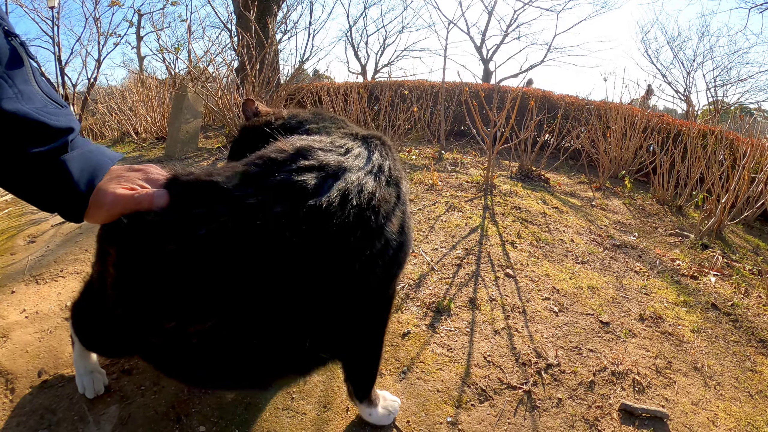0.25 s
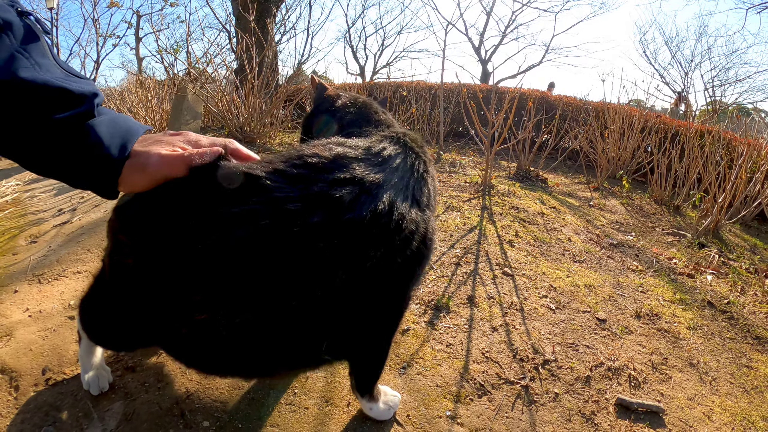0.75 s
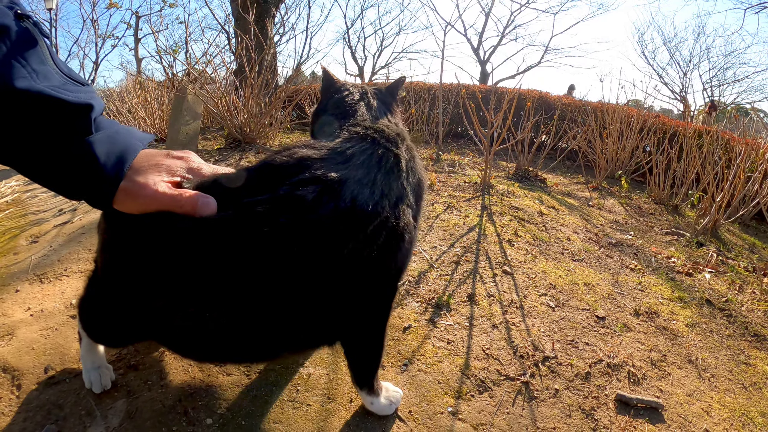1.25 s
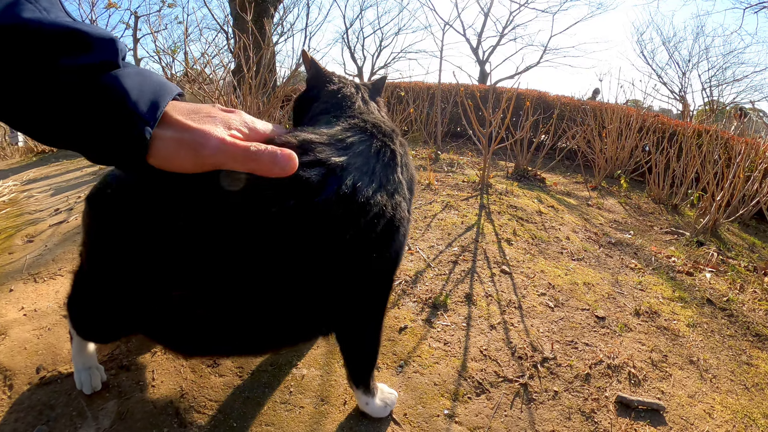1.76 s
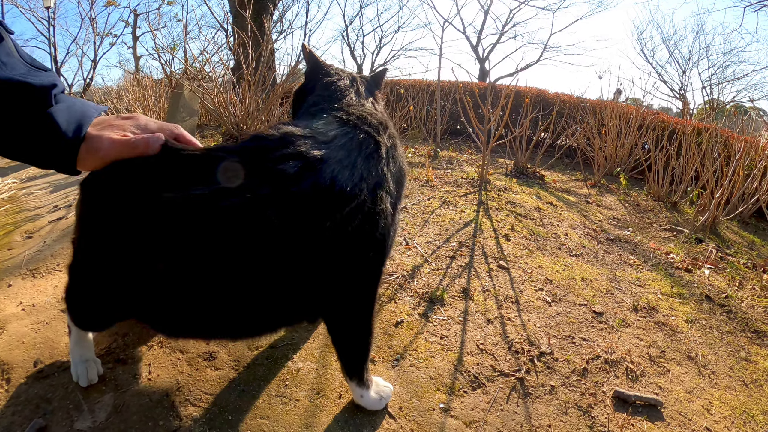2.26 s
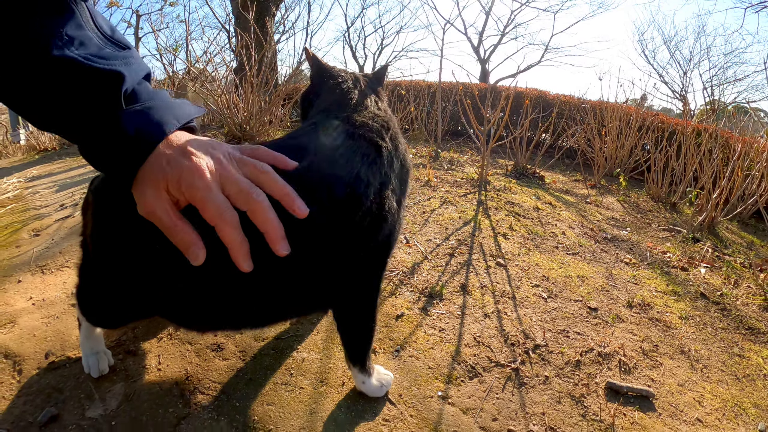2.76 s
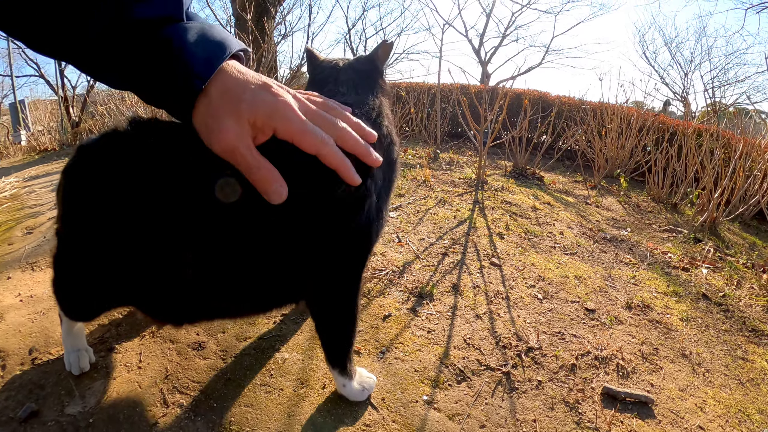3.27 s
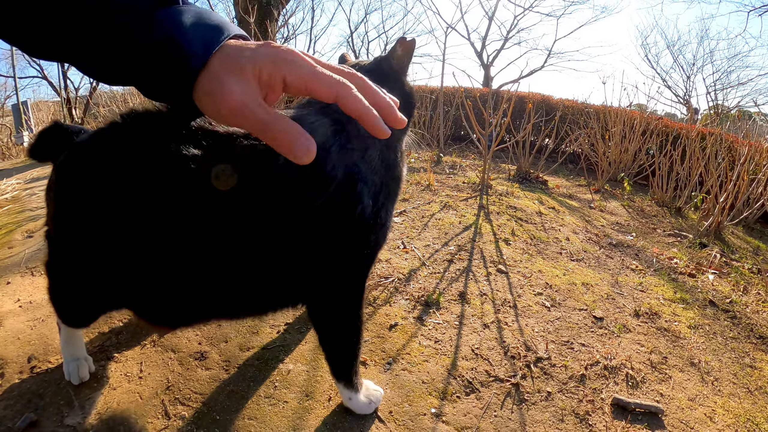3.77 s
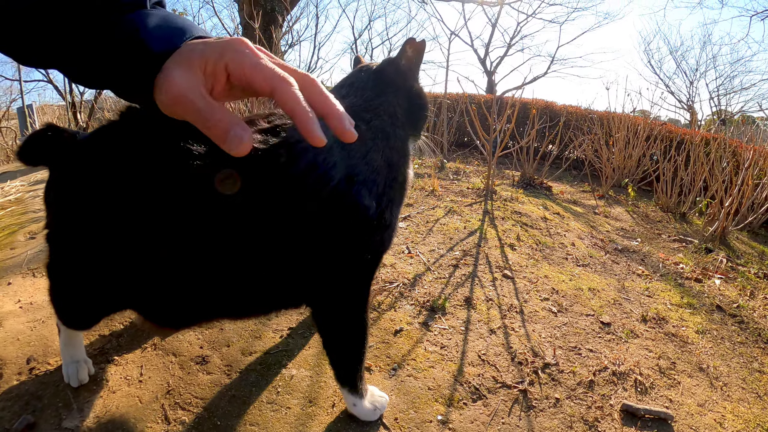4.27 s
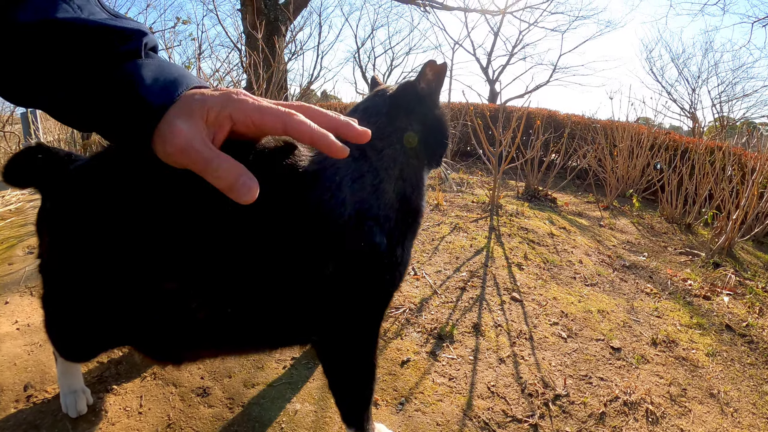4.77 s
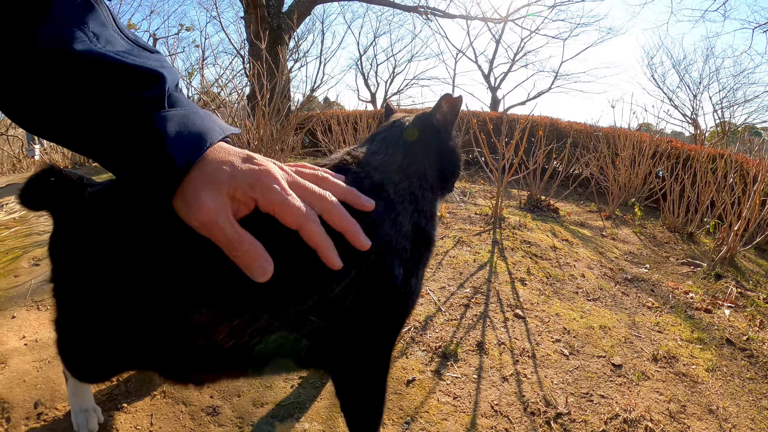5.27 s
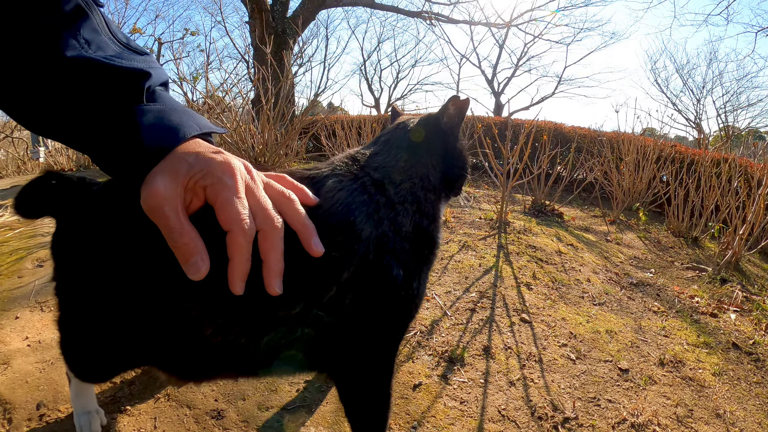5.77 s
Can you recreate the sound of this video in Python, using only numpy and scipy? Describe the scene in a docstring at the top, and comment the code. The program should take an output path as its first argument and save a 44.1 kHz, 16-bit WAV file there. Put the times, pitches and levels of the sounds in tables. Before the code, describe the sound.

Low traffic rumble outdoors while a hand softly pats a cat's fur, then a slow chugging engine approaches close by, passes and begins to fade.

```python
"""Engine passing a park hedge

Far traffic rumbles and surges; a slow-firing engine draws near on the road, passes and fades.
Exhaust: phased cosine orders of the firing rate, swelling and sinking as direct and reflected paths meet.
Gear hiss, narrow rings and tread roar: shaped noise, weaker as 1 / distance. Close by, a hand pats and
strokes a cat's fur: decaying scrapes and swishes of noise. A small camera microphone hears it in mono."""
import sys
import numpy as np
from scipy import signal
from scipy.fft import rfft, irfft, next_fast_len
from scipy.io import wavfile
from scipy.ndimage import uniform_filter1d

SR = 44100
rng = np.random.default_rng(int(sys.argv[2]) if len(sys.argv) > 2 else 0)


def store_pcm(level_fs):
    """Save levels as 16-bit WAV."""
    pcm = np.round(np.clip(level_fs, -1, 1) * 32767).astype(np.int16)
    wavfile.write(sys.argv[1], SR, np.atleast_2d(pcm).T)


N = 265482
T = np.arange(N) / SR
FFT_LEN = next_fast_len(N)
FFT_HZ = np.fft.rfftfreq(FFT_LEN, 1 / SR)

SPEED_M_S, CLOSEST_M, PASSES_S = 6.2, 4.454, 4.55
SOUND_M_S = 343
FIRING_HZ = 32  # before Doppler shift


def undb(db):
    """Amplitude ratio of a level in dB."""
    return np.exp(np.asarray(db) * np.log(10) / 20)


def level(x, db):
    """Scale x to an rms level in dB."""
    return x * undb(db) / np.sqrt(np.mean(x ** 2))


def walk(rate_hz):
    """Random levels held 1 / rate_hz and slewed twice; spread near 1."""
    hold = int(SR / rate_hz)
    steps = np.repeat(rng.standard_normal(N // hold + 1), hold)
    slewed = uniform_filter1d(uniform_filter1d(steps, hold), hold)
    return 1.374 * slewed[:N]


def bell(centre_s, sigma_s):
    """Gaussian in time, peak 1."""
    return np.exp(-.5 * ((T - centre_s) / sigma_s) ** 2)


def over_time(table):
    """Straight lines through a (t/s, value) table."""
    return np.interp(T, *np.transpose(table))


def double_peak(x, hz, q):
    """Resonance applied twice for steep skirts."""
    peak = signal.iirpeak(hz, q, fs=SR)
    return signal.lfilter(*peak, signal.lfilter(*peak, x))


def shape(table):
    """Bin gains of a (f/Hz, level/dB) table, straight on a log-frequency axis; -120 dB outside."""
    hz, db = np.transpose(table)
    return undb(np.interp(np.log(FFT_HZ + 1), np.log(hz), db, -120, -120))


def hiss(table, band_hz=(1200, 5000), treble_db=0, flicker_db=0, rate_hz=10):
    """Shaped noise, rms 1 in band_hz before tilt (dB/octave above 2.5 kHz) and third-octave flicker."""
    full = rfft(rng.standard_normal(FFT_LEN)) * shape(table)
    in_band = irfft(full * shape([(band_hz[0], 0), (band_hz[1], 0)]), FFT_LEN)
    full = full / np.std(in_band)
    third = 3 * np.log2((FFT_HZ + 1) / 2500)  # third-octaves from 2.5 kHz
    if flicker_db == 0:
        return irfft(full * undb(treble_db * np.maximum(third, 0) / 3), FFT_LEN)[:N]
    low, high = 3 * np.log2(np.array([table[0][0], table[-1][0]]) / 2500)
    out = np.zeros(N)
    for centre in np.arange(np.floor(low), np.ceil(high) + 1):
        window = np.cos(np.pi / 2 * np.clip(third - centre, -1, 1)) ** 2
        band = irfft(full * window, FFT_LEN)[:N]
        tilt_db = treble_db * max(centre, 0) / 3
        out += band * undb(tilt_db + flicker_db * walk(rate_hz))
    return out


def vehicle():
    """Straight pass: exhaust, gears and tyres, all weaker as 1 / distance."""
    along_m = SPEED_M_S * (T - PASSES_S)
    distance_m = np.hypot(along_m, CLOSEST_M)
    spread_db = 20 * np.log10(CLOSEST_M / distance_m)
    behind = along_m / distance_m  # towards -1 coming, +1 leaving
    return exhaust(spread_db, behind) + gears(spread_db, behind) + tyres(spread_db, behind)


def exhaust(spread_db, behind):
    """Firing-rate orders line up into one dull downward thud per firing; higher orders scatter more."""
    # Orders 1, 2, 3 ..: [base level when closest/dB, rear gain/dB (tailpipe side; reversed ahead), wander/dB,
    # reflected path cancels or props up the order: [t/s, change/dB, sigma/s]]
    orders = [(-37, 3, 1.5, [(4.2, 4, 0.2), (4.8, -13.5, 0.22)]), (-32.5, -1, 1.3, [(3.2, 9, 0.18),
              (3.7, 3.5, 0.12), (4.4, 7.5, 0.038), (5.5, 1.5, 0.21), (6.0, 4, 0.11)]),
              (-46.5, -1.5, 6.4, []), (-31.5, 3.5, 0.93, [(4, -12, 0.18), (2.7, 3, .12), (4.55, 1.5, 0.14),
              (4.95, -13.5, 0.13), (5.62, -22, 0.091)]), (-32, 7, 0.38, [(3.85, 2.5, 0.064),
              (4.35, -17, 0.057), (4.62, 0.5, 0.13), (4.96, -14, 0.055), (5.2, 2, 0.034), (5.45, -9, 0.057),
              (5.95, -5.5, 0.089)]), (-36.5, 2.5, 0.86, [(4.0, -0.5, .07), (4.22, -6.5, 0.12),
              (5.2, 3, 0.061), (5.6, 3, 0.16)]), (-35.5, 3, 1, [(3.72, -8.5, 0.27), (4.1, -1, .15),
              (2.6, -5, 0.45), (4.92, -15, 0.075), (5.28, -8, 0.087)]), (-47, 5.5, 2.3, [(4.55, 7, 0.1)]),
              (-52.5, 2, 2, [(3.7, 14, 0.11)]), (-48, 2.5, 1.3, [(3.45, 10, 0.14), (4.15, 10.5, 0.07),
              (5.25, 7, 0.067)]), (-53.5, 0, 2.9, [(4.2, 5, 0.069), (4.6, 9, 0.2)]),
              (-51, 0, 2.5, [(4.92, 14, 0.032)]), (-58.5, -5.5, 3.7, [])]
    smear_rad = .055  # pipe delay per order squared, smears each thud
    hz = FIRING_HZ * (1 - SPEED_M_S * behind / SOUND_M_S)  # Doppler
    turn = 2 * np.pi * np.cumsum(hz * (1 + 0.0015 * walk(12))) / SR
    out = np.zeros(N)
    for k, (closest_db, rear_db, wander_db, fades) in enumerate(orders, 1):
        db = closest_db + spread_db + rear_db * behind + wander_db * walk(6)
        for s, change_db, sigma_s in fades:
            db = db + change_db * bell(s, sigma_s)
        phase = k * turn - smear_rad * k ** 2 + .045 * k * walk(5)
        out -= np.sqrt(2) * undb(db) * np.cos(phase)
    return out


def gears(spread_db, behind):
    """Engine body, fan and gear hiss with narrow rings; slanting paths lose level through the hedge."""
    # Hiss spectrum: f/Hz, level/dB per Hz
    body = [(60, 11.5), (100, 25), (200, 21.5), (350, 17.5), (500, 7), (800, 1.5), (1040, -1), (1350, 1.5),
            (2380, -5.5), (3240, -10.5), (4300, -17.5), (5850, -22.5), (9000, -31), (12000, -42.5),
            (15000, -47.5)]
    # Treble brightens and dulls unevenly: t/s, tilt/dB per octave
    treble_tilt = [(0, 4.5), (.25, 0), (.52, -4.5), (.9, 3), (1.5, 3.5), (2.2, 2), (2.9, 2.5), (3.4, 1),
                   (3.9, -0.5), (4.6, 2.5), (5.3, 1), (6.02, 1)]
    # Hiss rises and sinks a little as it passes: t/s, level/dB
    swell = [(0, 0), (1.5, -2.5), (2.6, 0.5), (3.2, 0.5), (3.7, 1), (3.92, 1.5), (4.3, 0.5), (4.8, -1.5),
             (5.3, 0), (6.02, -0.5)]
    base_db, rear_db, hedge_db = -48.5, 1, -1.5  # base: closest, before swell
    noise = hiss(body, treble_db=over_time(treble_tilt), flicker_db=1.58, rate_hz=7) + rings()
    db = base_db + spread_db + rear_db * behind + hedge_db * behind ** 4 + over_time(swell)
    return noise * undb(db)


def rings():
    """Narrow noisy rings and brief bursts, each loudest at its own time."""
    # f/Hz, width/Hz, level over hiss/dB, loudest t/s, sigma/s
    resonances = [(1330, 210, -8, 4.24, 0.34), (2044, 83, -9, 5.2, 0.56), (2670, 87, -11, 5.02, 0.19),
                  (3090, 430, -8, 4.01, 0.32), (2850, 440, -10, 2.93, 0.44), (720, 140, 0, 3.86, 0.048),
                  (1050, 140, 5, .2, 0.23), (12000, 800, -31.5, 4.58, .2), (3166, 330, -9.5, 5, 0.53),
                  (3670, 580, -9.5, 6.1, 0.99), (7900, 700, -23.5, 3.3, 0.55),
                  (4400, 980, -15.5, 4.4, 0.56)]
    out = np.zeros(N)
    for hz, width_hz, db, s, sigma_s in resonances:
        ring = double_peak(rng.standard_normal(N), hz, hz / width_hz / 1.5)
        out += level(ring, db) * bell(s, sigma_s) * undb(1.2 * walk(4.8))
    return out


def tyres(spread_db, behind):
    """Tread roar: flickering band noise, louder from behind, quieter from ahead."""
    # f/Hz, level/dB per Hz
    tread = [(380, -19), (480, 0.5), (780, 5.5), (900, -3), (1050, -18)]
    closest_db, rear_db = -48, 7.5
    roar = hiss(tread, band_hz=(550, 900), flicker_db=1.5, rate_hz=5.9)
    return roar * undb(closest_db + spread_db + rear_db * behind)


def hand():
    """Pats: crisp coloured scrape plus ragged swish; strokes: brief or longer swells of bright rustle."""
    # Fur spectrum: f/Hz, level/dB per Hz
    fur = [(1200, 8), (2300, -3.5), (2900, 1), (3800, -7.5), (5000, -6.5), (7000, -14.5), (10000, -22.5),
           (14000, -45)]
    # Pats: t/s, swish level before decay/dB, t60/s, brightness/0-1, rise/s,
    # scrape f/Hz, scrape level before decay/dB
    pats = [(.088, -49.5, .27, .2, .004, 3400, -57), (.643, -53, .34, .3, .003, 3000, -59),
            (.66, -59, .34, .15, .006, 3600, -60), (1.149, -52, .3, .5, .002, 3600, -55),
            (1.664, -59, .3, .1, .006, 4800, -65), (1.744, -59, .4, .1, .009, 4200, -65),
            (2.206, -59, .42, .6, .006, 3600, -61)]
    # Strokes, some just before or after a pat: centre t/s, length/s, level/dB
    strokes = [(.075, .07, -70), (0.334, 0.36, -75.5), (1.083, 0.46, -74.5), (1.075, .08, -74),
               (1.142, .03, -66), (2.115, 0.16, -70), (2.22, .16, -71)]
    scrape_t60_s, scrape_q = .1, 1.6  # q per filter pass
    dull = hiss(fur, treble_db=-4., flicker_db=2., rate_hz=250)
    bright = hiss(fur, treble_db=2.5)
    grain = undb(1.8 * walk(700) + .3 * walk(110))  # hairs slip in bunches
    out = np.zeros(N)
    for s, db, t60_s, brightness, rise_s, hz, scrape_db in pats:
        age_s = np.clip(T - s + rise_s, 0, None)
        onset = (1 - np.exp(-age_s / rise_s)) ** 2 * grain
        rustle = dull + np.clip(brightness, 0, 1) * (bright - dull)
        swish = undb(db - 60 * age_s / t60_s) * rustle
        scrape = level(double_peak(dull, hz, scrape_q), scrape_db)
        out += onset * (swish + scrape * undb(-60 * age_s / scrape_t60_s))
    for s, length_s, db in strokes:
        swell = np.cos(np.pi * np.clip((T - s) / length_s, -.5, .5)) ** 2
        out += undb(db) * swell * bright * grain
    return out


def far_traffic():
    """Steady low rumble of shaped noise."""
    # f/Hz, level/dB per Hz
    rumble = [(8, -24), (12, -9), (32, -2), (45, -2.5), (75, -5.5), (181, -12.5), (292, -19), (420, -29.5),
              (515, -26), (700, -32), (1380, -46), (2400, -51.5), (3400, -77), (8000, -73), (10000, -100)]
    return level(hiss(rumble), -31)


def surges():
    """Rumble's chance surges: brief soft tones that swell and sink, wavering a little in pitch."""
    # centre t/s, sigma/s, f/Hz, peak rms level/dB
    tones = [(.36, 0.11, 40, -30), (0.81, 0.11, 33, -34.5), (.48, 0.15, 219, -44), (0.697, .13, 352, -49),
             (1.0, 0.065, 76, -38.5), (1.59, .12, 32, -34.5), (2.363, 0.12, 381, -49),
             (2.742, .12, 50, -38)]
    out = np.zeros(N)
    for s, sigma_s, hz, db in tones:
        turn = 2 * np.pi * np.cumsum(hz * (1 + 0.00988 * walk(6))) / SR
        out += np.sqrt(2) * undb(db) * bell(s, sigma_s) * np.cos(turn)
    return out


def scene():
    """Sum of all sources, with 4 ms ramps at both ends."""
    edges = np.clip(np.minimum(T, T[::-1]) / .004, 0, 1)
    return ((vehicle() + hand() + far_traffic() + surges()) * edges)[None, :]


def record(dry):
    """Camera microphone: each sound port adds its resonance; the top is cut."""
    # f/Hz, width/Hz, gain/dB
    ports = [(3410, 1330, 4), (7910, 1140, 3), (12100, 420, 8.5)]
    top_hz = 15000
    wet = dry
    for hz, width_hz, db in ports:
        peak = signal.iirpeak(hz, hz / width_hz, fs=SR)
        wet = wet + (undb(db) - 1) * signal.lfilter(*peak, wet)
    low_pass = signal.ellip(10, .2, 60, top_hz, fs=SR, output="sos")
    return signal.sosfilt(low_pass, wet)


dry = scene()
out = record(dry)
store_pcm(out)
```